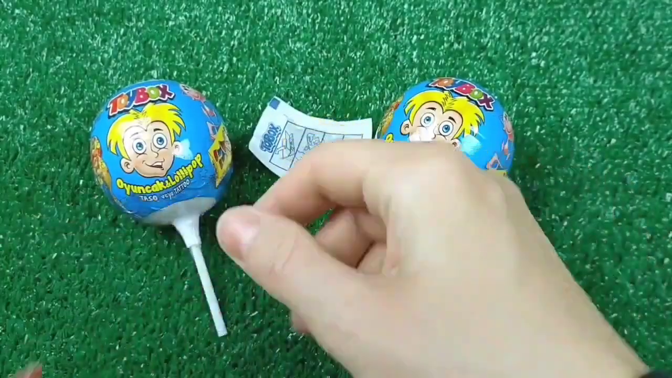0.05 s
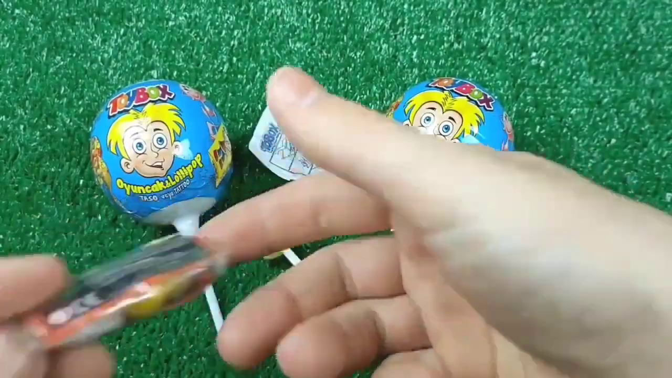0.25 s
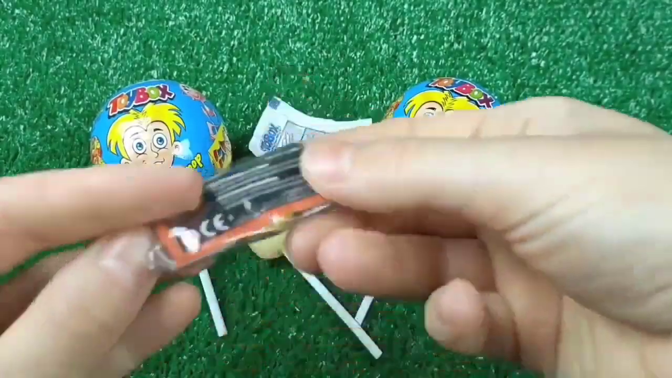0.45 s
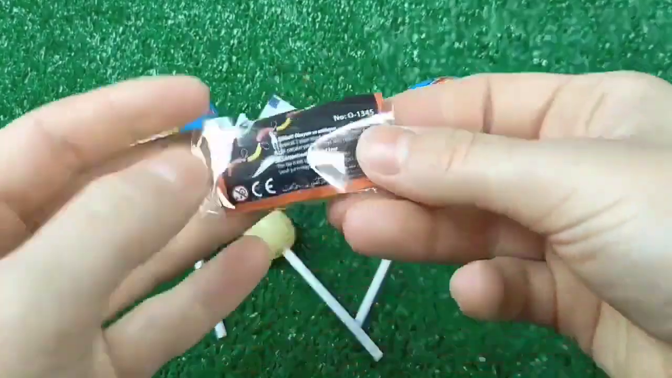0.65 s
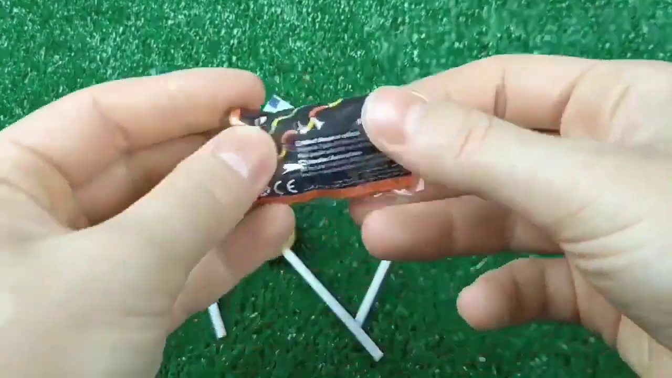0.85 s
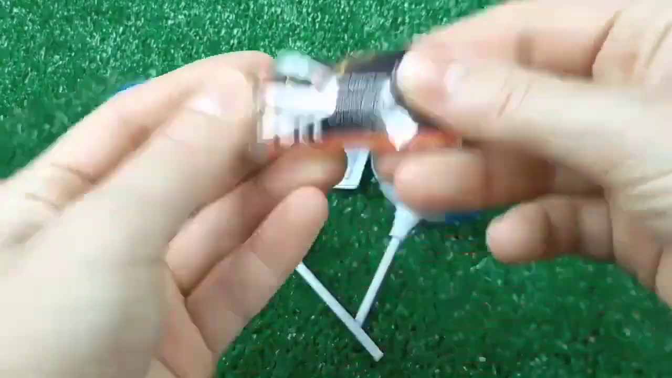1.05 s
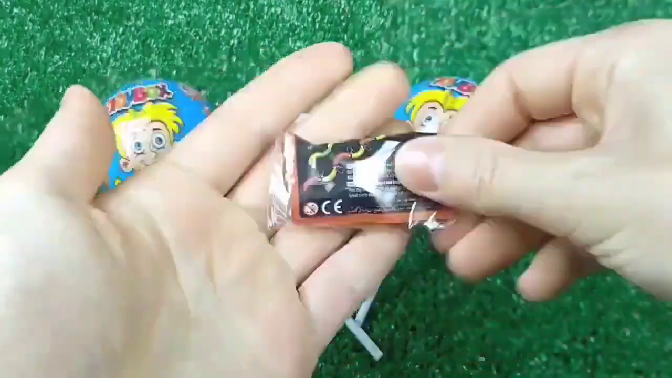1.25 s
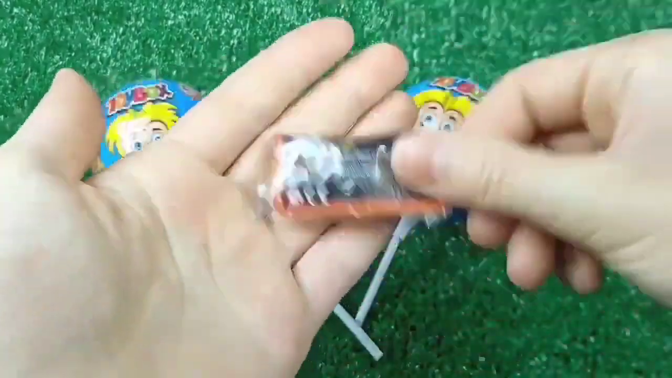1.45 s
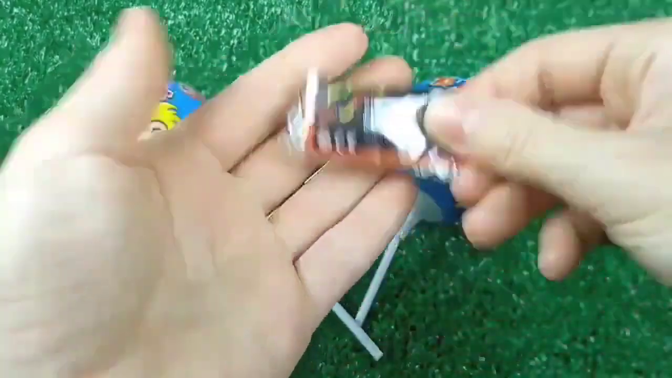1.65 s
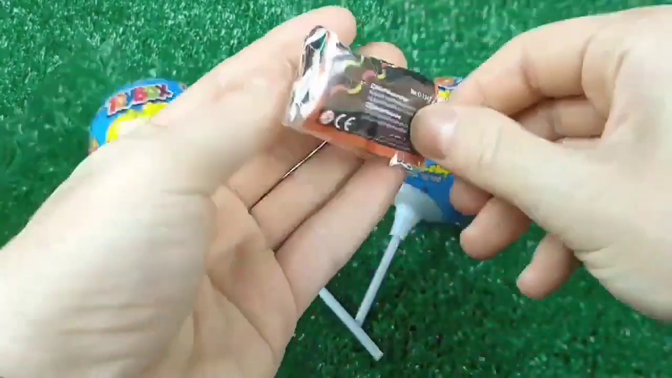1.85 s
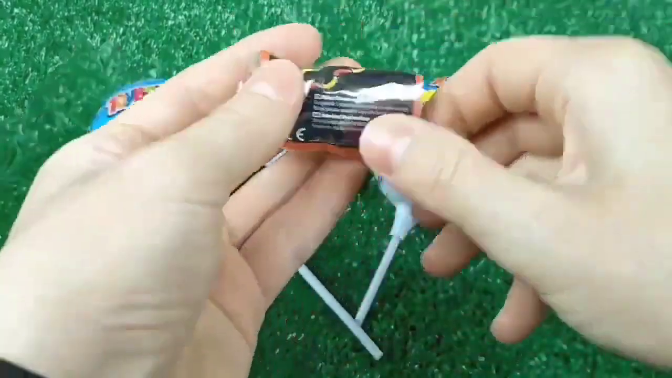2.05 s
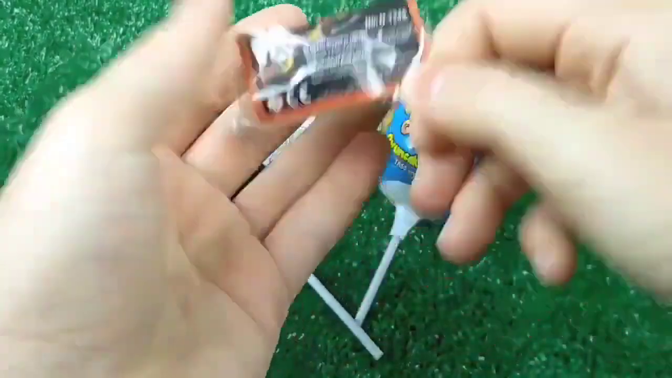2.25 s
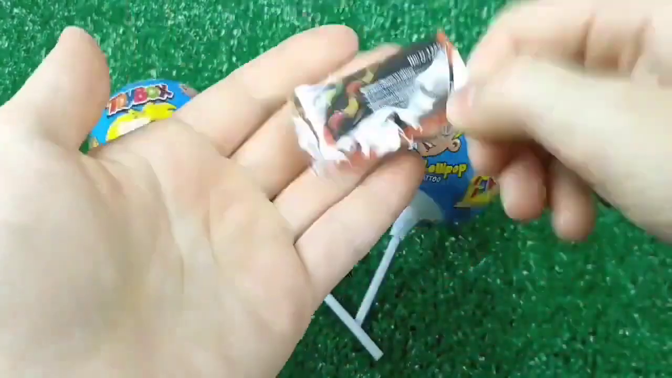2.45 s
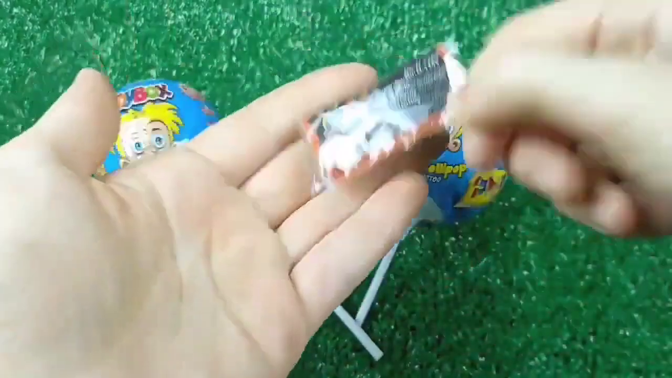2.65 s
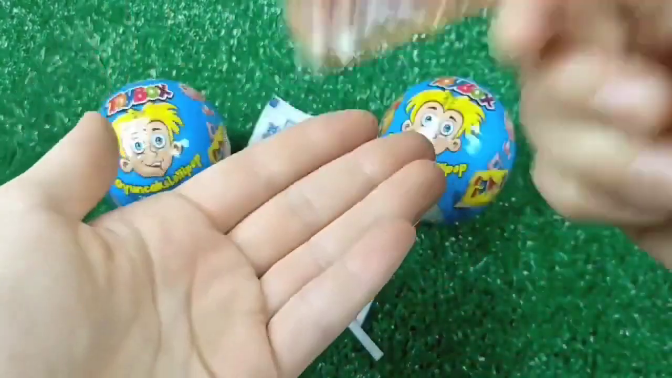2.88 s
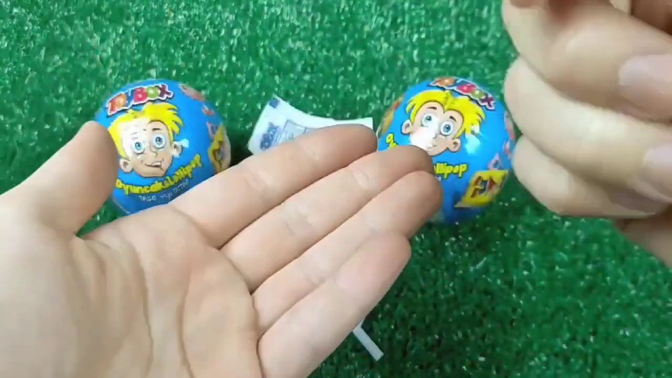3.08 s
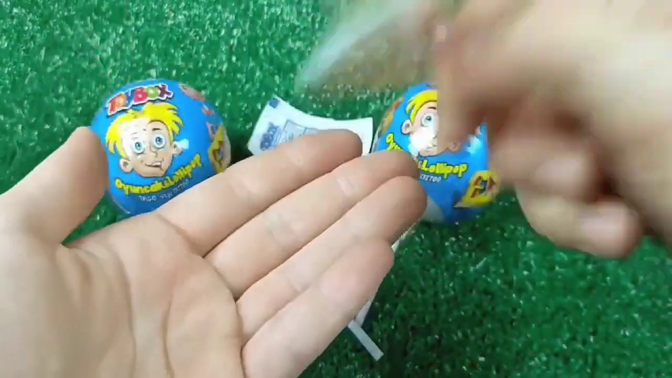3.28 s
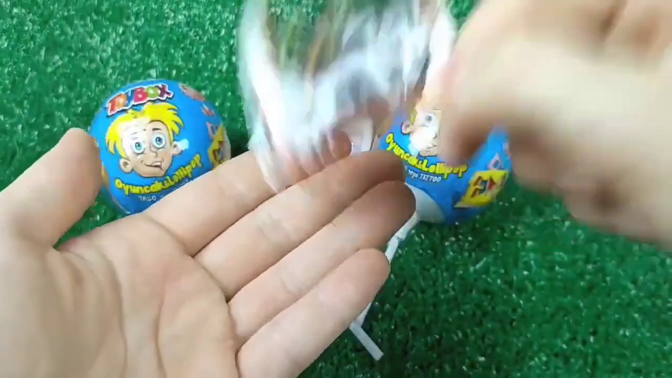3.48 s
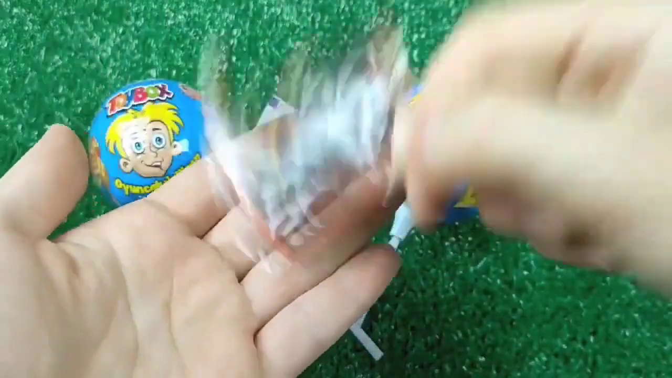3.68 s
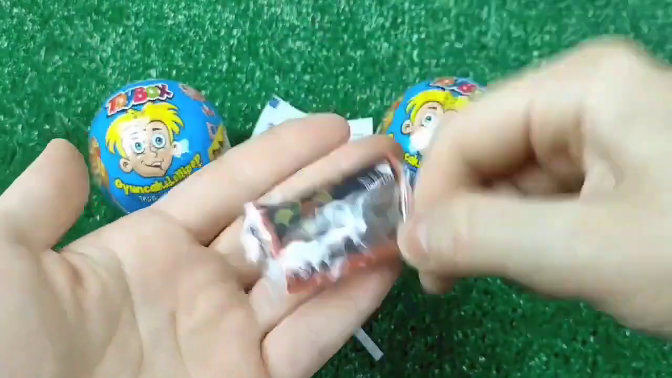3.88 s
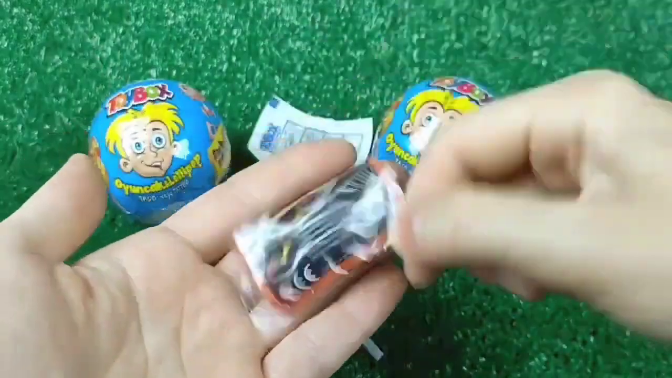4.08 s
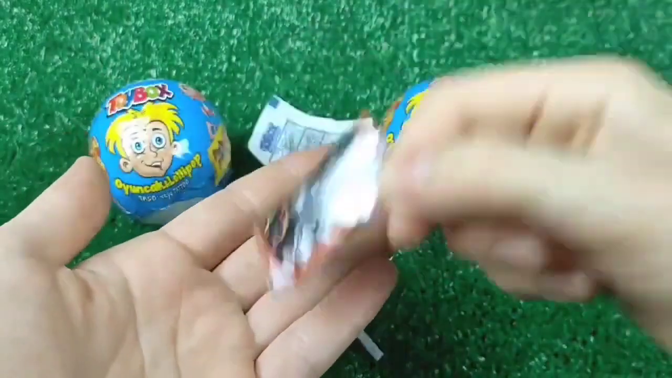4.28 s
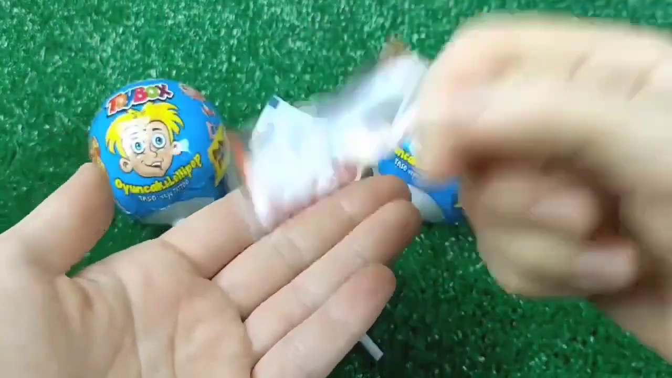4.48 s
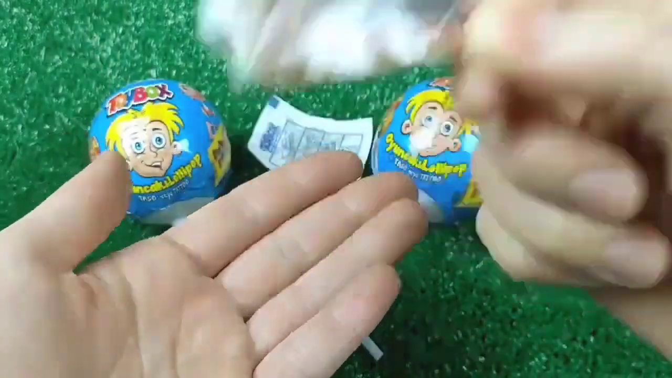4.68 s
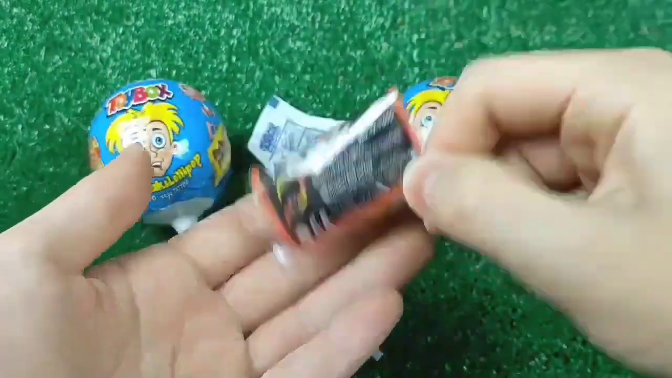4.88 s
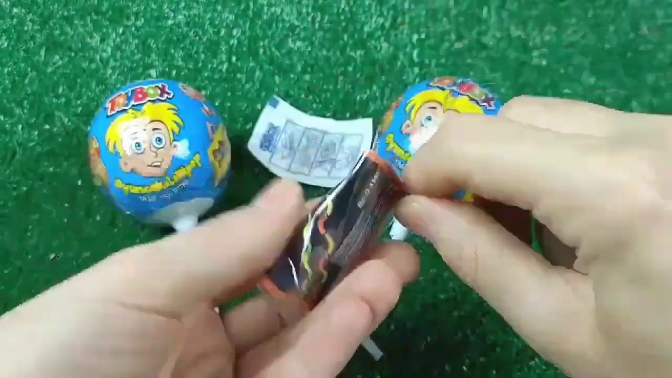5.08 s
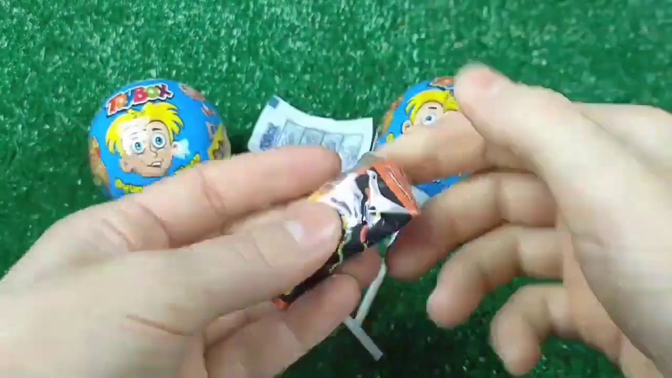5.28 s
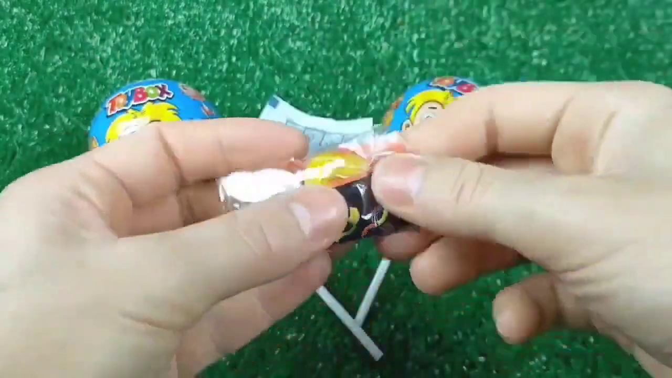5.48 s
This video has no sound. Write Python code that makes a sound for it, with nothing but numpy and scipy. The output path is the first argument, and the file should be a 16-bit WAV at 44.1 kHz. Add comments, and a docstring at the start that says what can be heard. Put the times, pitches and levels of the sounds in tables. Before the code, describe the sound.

Close, bright foil ticks and creases, then a fast, regular run of crisp crackling slaps on a palm, ending in faint handling.

```python
"""A small foil-plastic candy packet is crinkled in the hands, then shaken above a palm, close to a microphone.
In each stroke it snaps taut at the top, slaps the palm with a puff of air and rustles as it relaxes.
Slaps, snaps and ticking creases are bursts of tiny random clicks, filtered to the ring of foil and pouch.
Fingers tap and rub, a hand brushes past, and a small quiet room answers; the highest peaks are rounded off."""
import sys
import numpy as np
from scipy import signal
from scipy.fft import rfft, irfft, next_fast_len
from scipy.io import wavfile
from scipy.ndimage import map_coordinates

SR = 44100
rng = np.random.default_rng(int(sys.argv[2]) if len(sys.argv) > 2 else 0)


def digitize_waveform(pressure):
    """Quantize a signal to 16-bit integers and store it at the path in sys.argv[1].

    Rows of a 2-D input are taken as channels; values are limited to [-1, 1].
    """
    field = np.atleast_2d(pressure).T
    bounded = np.clip(field, -1, 1)
    quanta = np.round(bounded * 32767).astype(np.int16)
    wavfile.write(sys.argv[1], SR, quanta)


N = 243873  # length in samples

# The packet slaps the palm. Each row: time in seconds, level in dB, pitch of the hollow pouch in Hz,
# relative strength of the air puff in dB, level of the rustle after it in dB.
PALM_SLAPS = [(1.4556, -7.5, 1590, -78, -19), (1.6422, -8.5, 1480, -80, -28),
              (1.822, -10.5, 810, -64, -21.5), (2.668, -11.5, 660, -33.5, -21.5),
              (2.8355, -9, 1480, -46.5, -23.5), (3.0219, -8.5, 1490, -42, -27),
              (3.2035, -8.5, 1540, -41, -22), (3.3717, -9.5, 1600, -47, -22.5),
              (3.5338, -9.5, 720, -47, -25.5), (3.7225, -10.5, 1940, -53, -25), (3.9183, -9, 500, -44, -19),
              (4.0987, -10, 1050, -34, -22), (4.2821, -8.5, 1090, -38, -19), (4.4609, -8, 1800, -47, -23.5),
              (4.6404, -7, 1680, -43, -22.5), (4.8154, -7.5, 1410, -38, -23.5),
              (4.9886, -9, 1870, -44, -22)]
# The packet snaps taut at the top of a stroke. Each row: time in seconds, level in dB, pouch body in dB.
TAUT_SNAPS = [(2.9735, -16, -3.5), (3.1517, -12, -1), (3.321, -10.5, -5.5), (3.4824, -8.5, -4.5),
              (3.66, -15, -7), (3.8582, -15, -2), (4.0514, -10.5, -.5), (4.2342, -13, -3),
              (4.41, -11, -1.5), (4.5876, -11.5, -2.5), (4.7639, -9.5, 0), (4.9399, -11, -5.5)]
# Colour of low, rumbling air. Each row: frequency in Hz, relative strength in dB per Hz.
RUMBLE_COLOUR = [(15, -11), (32, 0), (60, -5.5), (110, -13), (200, -27), (600, -42), (2000, -100)]
FACET_HZ, FACET_SPREAD = 4200, 0.21  # usual pitch of a flat piece of foil (Hz), its relative scatter
SIZZLE_PER_BODY = 0.65  # a crease that moves more of the packet also cracks brighter (dB per dB)


def amp(db):
    """Turn decibels into a gain."""
    return 10 ** (np.asarray(db) / 20)


def unit(x):
    """Scale a sound to an rms of 1."""
    return x / np.sqrt(np.mean(x ** 2) + 1e-20)


def along(points, hz):
    """Read a curve of (Hz, value) points on a logarithmic frequency axis."""
    point_hz, values = np.transpose(points)
    return np.interp(np.log(hz + 1), np.log(point_hz + 1), values)


def curves(rows):
    """Draw straight lines between rows: one value per sample for each column after the time."""
    seconds, *columns = np.transpose(rows)
    return [np.interp(np.arange(N) / SR, seconds, column) for column in columns]


def wobble(rate):
    """A smooth random curve with the given number of random points a second."""
    knots = rng.standard_normal(int(N * rate / SR) + 4)
    return map_coordinates(knots, [np.arange(N) * rate / SR])


def add(track, s, sound):
    """Mix a sound into the track from time s (seconds)."""
    start = max(round(s * SR), 0)
    part = track[:, start:start + sound.shape[1]]
    part += sound[:, :part.shape[1]]


def coloured(x, gain_db):
    """Filter with a gain in dB given for each frequency; nothing sounds ahead of its cause."""
    size = 2 * next_fast_len(x.shape[-1] // 2 + SR // 20)
    gain = amp(gain_db(np.fft.rfftfreq(size, 1 / SR)))
    # folding the cepstrum forward in time gives the filter minimum phase
    cepstrum = irfft(np.log(gain + 1e-6))
    cepstrum[1:size // 2] *= 2
    cepstrum[size // 2 + 1:] = 0
    return irfft(rfft(x, size) * np.exp(rfft(cepstrum)))[..., :x.shape[-1]]


def bump(hz, centre_hz):
    """The curve of a broad resonance, 1 at its centre."""
    octaves = np.log2((hz + 1) / centre_hz)
    return np.exp(-.5 * (octaves / .21) ** 2)


def tone(hz, thud_db, body_db, sizzle_db, thud_hz=480, body_hz=2200, sizzle_hz=6800):
    """Colour of a contact: the thud on skin, the pouch's body and the sizzle of the thin foil."""
    below = lambda edge: 1 / (1 + (hz / edge) ** 7)
    return thud_db * below(thud_hz) + body_db * below(body_hz) + sizzle_db * (1 - below(sizzle_hz))


def ports(pair, pan_db, lead=0.00013):
    """Mix two unrelated signals into left and right microphone ports; sound reaches the left first by lead (s)."""
    # How alike left and right are. Each row: frequency in Hz, likeness (1 is identical).
    likeness = [(100, 0.17), (300, 0.75), (1000, 0.56), (2000, 0.44), (4000, 0.24), (10000, 0.056)]
    size = 2 * next_fast_len(pair.shape[1] // 2 + SR // 20)
    hz = np.fft.rfftfreq(size, 1 / SR)
    turn = np.arccos(np.clip(along(likeness, hz), -1, 1)) / 2
    mid, side = rfft(pair, size) * [np.cos(turn), np.sin(turn)]
    left = (mid + side) * amp(pan_db / 2)
    right = (mid - side) * np.exp(-2j * np.pi * hz * lead) * amp(-pan_db / 2)
    return irfft(np.array([left, right]))[:, :pair.shape[1]]


def grains(size, rate, spread_db):
    """Tiny buckles of the foil: clicks at random times, rate a second, most small and a few large."""
    hit = rng.random(size) < rate / SR
    strength = amp(spread_db * np.minimum(rng.exponential(size=size), 4))
    return unit(hit * strength * rng.choice([-1, 1], (2, size)))


def burst(pair, db, pan_db, seconds):
    """A burst at the two ports, with the energy of a level (dB) held for some seconds."""
    x = ports(pair, pan_db=0)
    x = x / (np.linalg.norm(x, axis=1, keepdims=True) + 1e-20)
    x = x * amp([[pan_db / 2], [-pan_db / 2]])
    return x / np.linalg.norm(x) * amp(db) * np.sqrt(2 * seconds * SR)


def flick(colour, db, rise, fall, crumple_db, width=0.0014, ring_db=4):
    """The whole packet snaps: buckles build, crack and crumple on; gives (lead-in in seconds, sound)."""
    # Colour of the whole packet. Each row: frequency in Hz, relative strength in dB per Hz.
    packet_colour = [(40, -21), (100, -9), (250, -10.5), (550, -9.5), (900, -6), (1400, -3), (2000, 1),
                     (2700, -3.5), (4000, 1.5), (5500, -1.5), (8000, -10.5), (11000, -17), (15000, -18.5)]
    t = np.arange(-SR // 50, SR // 20) / SR
    crack = np.exp(-.5 * (t / width) ** 2)
    crumple = np.exp(np.minimum(t / rise, -t / fall))
    buckles = (crack + amp(crumple_db) * crumple) * grains(len(t), rate=30000, spread_db=0.9)
    ring_hz = FACET_HZ * np.exp(FACET_SPREAD * rng.standard_normal())
    gain_db = lambda hz: along(packet_colour, hz) + ring_db * bump(hz, ring_hz) + colour(hz)
    return -t[0], burst(coloured(buckles, gain_db), db, pan_db=1.5, seconds=0.0046)


def slaps(hollow_db=6, thud_db=-1.5, mean_body_db=1.5, sizzle_db=0.5):
    """Landing on the palm sounds the air in the pouch; the flatter it lands, the fuller the slap."""
    usual_puff_db, body_per_puff = -50, .3  # a flatter slap pushes more air and has more body
    usual_slap_db, hollow_per_level = -9, 0.84  # a harder slap rings the pouch more clearly
    track = np.zeros((2, N))
    for s, db, hollow_hz, puff_db, _ in PALM_SLAPS:
        body_db = mean_body_db + body_per_puff * (puff_db - usual_puff_db)
        knock_db = hollow_db + hollow_per_level * (db - usual_slap_db)
        bright_db = sizzle_db + SIZZLE_PER_BODY * body_db
        colour = lambda hz: knock_db * bump(hz, hollow_hz) + tone(hz, thud_db, body_db, bright_db)
        lead, sound = flick(colour, db, rise=0.0025, fall=0.011, crumple_db=-7)
        add(track, s - lead, sound)
    return track


def snaps(hollow_hz=1300, hollow_db=3, thud_db=6, sizzle_db=-1.3):
    """At the top of each stroke the packet pulls taut with a dry thud."""
    track = np.zeros((2, N))
    for s, db, body_db in TAUT_SNAPS:
        colour = lambda hz: hollow_db * bump(hz, hollow_hz) + tone(hz, thud_db, body_db, sizzle_db)
        lead, sound = flick(colour, db, rise=0.0037, fall=0.006, crumple_db=-5)
        add(track, s - lead, sound)
    return track


def creases(rows, rise=0.0011, fall=0.0014, after_db=-20, after_rise=0.0016, after_fall=0.0072,
            thud_db=-2, sizzle_db=4.0):
    """Each crease gives way at once and rings its flat piece of foil; smaller buckles surround it."""
    # Colour of one tick. Each row: frequency in Hz, relative strength in dB per Hz.
    tick_colour = [(40, -32), (100, -23), (250, -21.5), (550, -14.5), (900, -7), (1400, -5), (2000, 1),
                   (2700, -2.5), (4000, 3.5), (5500, 0), (8000, -9.5), (11000, -13), (15000, -20)]
    track = np.zeros((2, N))
    t = np.arange(-SR // 100, SR // 30) / SR
    crack = np.exp(np.minimum(t / rise, -t / fall))
    after = np.exp(np.minimum(t / after_rise, -t / after_fall))
    shape = crack + amp(after_db) * after
    for s, db, ring_hz, body_db in rows:
        buckles = shape * grains(len(t), rate=32000, spread_db=1.2)
        bright_db = sizzle_db + SIZZLE_PER_BODY * body_db
        contact = lambda hz: tone(hz, thud_db, body_db, bright_db)
        tick = coloured(buckles, lambda hz: along(tick_colour, hz) + 9 * bump(hz, ring_hz) + contact(hz))
        add(track, s + t[0] - .0004, burst(tick, db, pan_db=3.0, seconds=0.0025))
    return track


def strays(effort, per_second=30, over_db=3, spread_db=4, body_spread_db=6):
    """Rows for creases(): small creases at random moments, louder where the foil is worked harder."""
    rows = []
    for i in rng.integers(N, size=int(per_second * N / SR)):
        a, b, c = rng.standard_normal(3)
        db = 20 * np.log10(effort[i]) + over_db + spread_db * a
        rows.append((i / SR, db, FACET_HZ * np.exp(FACET_SPREAD * b), body_spread_db * c))
    return rows


def bending(rub_shape=1.74):
    """How hard foil and pouch are worked: shaking, finger rubs, swings around snaps, relaxing after slaps."""
    # The foil flutters all through the shaking. Each row: time in seconds, level in dB.
    flutter = [(2.56, -85), (2.66, -31), (3.5, -35), (4.2, -33.5), (5.06, -34.5), (5.3, -63.5)]
    # The fingers rub or bend the foil. Each row: middle in seconds, width in seconds, level in dB,
    # pouch sound over its usual share in dB.
    finger_rubs = [(.3, .026, -57, -3), (0.47, 0.029, -45.5, 0.5), (.751, 0.034, -39, -2),
                   (0.849, .015, -36, -3), (1.002, 0.025, -30, 3), (1.08, 0.02, -35.5, -11.5),
                   (1.158, 0.024, -34.5, 1), (1.278, .02, -19.5, -1.5), (1.375, .018, -37.5, -0.5),
                   (1.594, 0.021, -43, 4), (1.693, 0.011, -25.5, -1), (1.75, 0.0091, -29.5, 1),
                   (1.95, 0.013, -43.5, 6), (2.035, 0.0094, -24.5, -1), (2.235, 0.021, -30.5, 1),
                   (2.299, 0.016, -30, 1.5), (2.445, 0.035, -32, 2.5), (2.607, 0.031, -32.5, -3.5),
                   (2.662, .01, -19.5, 0), (2.788, 0.011, -22.5, -2.5), (3.064, 0.0093, -26.5, 7.5),
                   (4.148, 0.016, -25, -1), (5.13, 0.018, -37, 0), (5.352, 0.031, -36.5, 1),
                   (5.42, 0.048, -39, -2)]
    swing_db, swing_rise, swing_fall = -7, 0.015, 0.011  # level against the snap (dB), then seconds
    relax_rise, relax_time, relax_shape = 0.0052, 0.046, 1.47  # seconds, seconds, steepness of the end
    power = np.tile(amp(curves(flutter)) ** 2, (2, 1))
    t = np.arange(-SR // 4, SR // 4) / SR
    swing = np.exp(np.minimum(t / swing_rise, -t / swing_fall))
    relax = np.exp(np.minimum(t / relax_rise, -np.abs(t / relax_time) ** relax_shape))
    swells = [(s, db, pouch_db, np.exp(-np.abs(t / width) ** rub_shape / 2))
              for s, width, db, pouch_db in finger_rubs]
    swells += [(s, db + swing_db, 0, swing) for s, db, _ in TAUT_SNAPS]
    swells += [(s, db, 0, relax) for s, *_, db in PALM_SLAPS]
    for s, db, pouch_db, shape in swells:
        add(power, s + t[0], (amp([[db], [db + pouch_db]]) * shape) ** 2)
    return np.sqrt(power)


def clumps():
    """Dense small buckles; now and then one sets off its neighbours and a crackle stands out."""
    triggers = (rng.random(N) < 22 / SR) * rng.uniform(2, 7.5, N)
    avalanches = signal.lfilter([1], [1, -np.exp(-1 / (.0009 * SR))], triggers)  # each fades in about 1 ms
    return unit(grains(N, rate=2600, spread_db=2.5) * (amp(3 * wobble(160)) + avalanches))


def rustle(effort, pouch_effort, foil_db=0, pouch_db=-9.0, drift_db=3.5):
    """Each flat piece of foil crackles on its own, now more, now less; all also sound the hollow pouch."""
    # Colours of the foil and of the pouch. Each row: frequency in Hz, relative strength in dB per Hz.
    foil_colour = [(600, -23), (1600, -3.5), (2300, 3.5), (3000, 7), (3900, 5), (5300, 2.5), (6500, 1),
                   (8200, -4.5), (11000, -4.5), (12500, -9.5), (15000, -13.5)]
    pouch_colour = [(60, -30), (150, -13), (230, -20.5), (330, -21), (550, -13), (850, -10), (1400, 1),
                    (1950, 8.5), (2500, -17.5), (4000, -36)]
    # Broad resonances of the foil's flat pieces, each in Hz.
    facet_pitches = [2600, 3400, 3900, 4370, 5780]
    foil, all_buckles = np.zeros((2, N)), np.zeros((2, N))
    for ring_hz in facet_pitches:
        buckles = clumps() * amp(drift_db * wobble(35))
        foil += coloured(buckles, lambda hz: along(foil_colour, hz) + 9 * bump(hz, ring_hz))
        all_buckles += buckles
    pouch = coloured(all_buckles, lambda hz: along(pouch_colour, hz))
    foil_sound = effort * amp(foil_db) * unit(ports(foil, pan_db=1.5))
    pouch_sound = pouch_effort * amp(pouch_db) * unit(ports(pouch, pan_db=-0.5))
    return foil_sound + pouch_sound


def taps(fall=0.00098):
    """A fingertip gives the packet one soft push: a very short noise without ring."""
    # Soft knocks of the fingers. Each row: time in seconds, level in dB.
    finger_taps = [(.819, -50.5), (.977, -39.5), (1.096, -47), (1.124, -41.5), (1.162, -41), (1.869, -50),
                   (2.237, -44)]
    # Colour of skin on the packet. Each row: frequency in Hz, relative strength in dB per Hz.
    skin_colour = [(30, -1), (90, -8), (220, -7), (400, -7), (780, -8.5), (1100, -24), (3000, -29)]
    track = np.zeros((2, N))
    t = np.arange(SR // 15) / SR
    for s, db in finger_taps:
        noise = np.exp(-t / fall) * rng.standard_normal((2, len(t)))
        push = coloured(noise, lambda hz: along(skin_colour, hz))
        add(track, s - .001, burst(push, db, pan_db=2, seconds=.01))
    return track


def rumble(size):
    """Low, uneven air: two channels of noise filtered to a rumble."""
    return coloured(rng.standard_normal((2, size)), lambda hz: along(RUMBLE_COLOUR, hz))


def air(push_hz=27, life=0.023, puff_db=9, swirl_db=-4):
    """Each slap pushes one slow wave of air at the ports, with eddies in it; at the end a hand brushes past."""
    # A hand brushes near the microphone. Each row: time in seconds, relative level in dB.
    hand_brush = [(5.3, -64), (5.324, -73), (5.408, -45.5), (5.45, -41.5), (5.476, -47), (5.504, -44),
                  (5.53, -56)]
    puffs = np.zeros((2, N))
    t = np.arange(SR // 5) / SR
    shape = np.exp(-t / life) * (1 - np.exp(-t / 0.003))
    for s, _, _, db, _ in PALM_SLAPS:
        hz = push_hz * np.exp(0.15 * rng.standard_normal())
        push = -np.sin(2 * np.pi * hz * t)
        eddies = unit(rumble(len(t)))
        add(puffs, s - .003, amp(db + puff_db) * (push + amp(swirl_db) * eddies) * shape)
    fade = np.clip((np.arange(N) / SR - hand_brush[0][0]) / .05, 0, 1)
    brush = fade * amp(curves(hand_brush)[0] + 1.0) * unit(rumble(N))
    return puffs * amp([[2.5], [-3]]) + brush * amp([[4], [-5]])  # both stronger on the left


def room(x, onset=0.0012):
    """The room's diffuse answer: fading noise tails; four take turns, as the moving hands change it."""
    # How long the room rings. Each row: frequency in Hz, time to fall by 60 dB in seconds.
    ring_times = [(200, 0.24), (800, 0.35), (2000, 0.21), (5500, 0.2), (14000, 0.23)]
    t = np.arange(N) / SR
    wet = np.zeros((2, N))
    count = 4
    for k in range(count):
        hz, age, z = signal.stft(rng.standard_normal((2, SR // 2)), SR, nperseg=256)
        fading = z * amp(-60 * age / along(ring_times, hz)[:, None])
        tail = signal.istft(fading, SR, nperseg=256)[1]
        build_up = 1 - np.exp(-(np.arange(tail.shape[1]) / SR / onset) ** 2)
        tail = ports(tail * build_up, pan_db=1.0, lead=0)
        share = (t // .17) % count == k  # each turn lasts 0.17 s
        wet += signal.fftconvolve(x[:1] * share, tail / np.linalg.norm(tail[0]), axes=1)[:, :N]
    return wet


def background(quiet_db=-71, stir_db=-59, stir_swing_db=0.5):
    """Faint filtered room noise, and a low uneven stir of air while the hands are at work."""
    # Colour of the quiet room. Each row: frequency in Hz, relative strength in dB per Hz.
    quiet_colour = [(12, -38), (20, -4), (53, 7), (105, -10), (211, 6.5), (841, -13.5), (2550, -10),
                    (5240, -17), (8620, -31), (15000, -40)]
    # How much the hands move the air. Each row: time in seconds, relative level in dB.
    hand_motion = [(0, -16), (.6, -6.5), (1.1, -3.5), (2.5, -2), (3, 1), (5, -5), (5.25, -4.5)]
    noise = coloured(rng.standard_normal((2, N)), lambda hz: along(quiet_colour, hz))
    quiet = unit(ports(noise, pan_db=1.5))
    stir = unit(ports(rumble(N), pan_db=-2.0))
    stir_level = stir_db + curves(hand_motion)[0] + stir_swing_db * wobble(11)
    return amp(quiet_db) * quiet + amp(stir_level) * stir


def scene(room_db=-10.5, boom_hz=225, boom_db=7):
    """The packet close by, its room with one low resonance, and the air at the microphone."""
    # Single creases buckle. Each row: time in seconds, level in dB, pitch of the foil in Hz, body in dB.
    single_creases = [(.1053, -47.5, 5800, 1), (.2555, -40.5, 6150, -5), (.2723, -32.5, 3400, -12),
                      (.3502, -43.5, 4440, 0), (.4502, -27.5, 3180, -4), (.468, -23.5, 3020, 0.5),
                      (.6497, -34, 4570, 5), (.6743, -35, 3560, -4), (.6887, -33, 4200, 6.5),
                      (.713, -30, 4700, -13), (.744, -20, 6100, -8), (.7613, -24, 3600, 4.5),
                      (.802, -17.5, 5700, -7), (.8188, -11.5, 3900, -1), (.8543, -21, 5060, 4),
                      (.9477, -20, 3750, 8), (.9769, -31, 5800, 19), (1.0035, -22, 4400, -1),
                      (1.0121, -22.5, 2030, 1), (1.0658, -23, 3670, 2), (1.0963, -19.5, 5050, 5.5),
                      (1.1257, -20.5, 5800, 3.5), (1.1398, -23, 5470, -7), (1.1623, -21.5, 5200, 10),
                      (1.1986, -20, 3830, -1), (1.2211, -20, 6900, -16), (1.2415, -23, 4830, -12),
                      (1.292, -15, 4500, 2.5), (1.37, -25, 4440, -1), (1.4109, -17, 6260, -13),
                      (1.422, -16.5, 3120, 4), (1.4304, -17.5, 4460, 5), (1.797, -35, 5560, 2),
                      (1.8299, -10.5, 4380, -10), (1.8612, -16, 4370, -1.5), (1.869, -17.5, 4500, 8),
                      (1.9718, -25, 4070, -9), (1.9927, -20, 3860, 8.5), (2.0277, -18, 3900, -12),
                      (2.1116, -16, 4160, -15), (2.136, -21.5, 4050, -4), (2.1573, -16, 4140, -12.5),
                      (2.2369, -17, 3900, 3), (2.2538, -22, 3870, -1), (2.342, -29, 3970, 9),
                      (2.3821, -30.5, 6270, 20), (2.4016, -16.5, 3830, -5), (2.453, -20, 3400, 6),
                      (2.5746, -22.5, 3520, -2), (2.749, -24, 4010, 4), (3.0673, -18, 3380, 3),
                      (4.1663, -16, 4600, -3.5), (4.213, -18.5, 4500, 3), (4.82, -10.5, 5230, -4),
                      (5.0647, -20.5, 3680, -1), (5.15, -18.5, 5890, -6), (5.27, -40.5, 2070, 11),
                      (5.3174, -31, 6740, -19), (5.3407, -26, 4070, -13), (5.3912, -23, 3760, 2.5),
                      (5.4389, -29, 4120, 7), (5.483, -36.5, 5800, 4)]
    effort, pouch_effort = bending()
    packet = slaps() + snaps() + creases(single_creases) + creases(strays(effort))
    packet += rustle(effort, pouch_effort) + taps()
    answer = coloured(room(packet), lambda hz: boom_db * bump(hz, boom_hz))
    return packet + amp(room_db) * answer + air() + background()


def record(dry, top_hz=15600):
    """The recorder rounds off the highest peaks and keeps nothing above its band limit."""
    clipped = dry / (1 + np.abs(dry) ** 6) ** (1 / 6)
    size = next_fast_len(N + SR // 2)
    hz = np.fft.rfftfreq(size, 1 / SR)
    passband = np.clip((top_hz - hz) / 300 + .5, 0, 1)  # a slope 300 Hz wide around the limit
    return irfft(rfft(clipped, size) * passband, size)[:, :N]


dry = scene()
out = record(dry)
digitize_waveform(out)
```